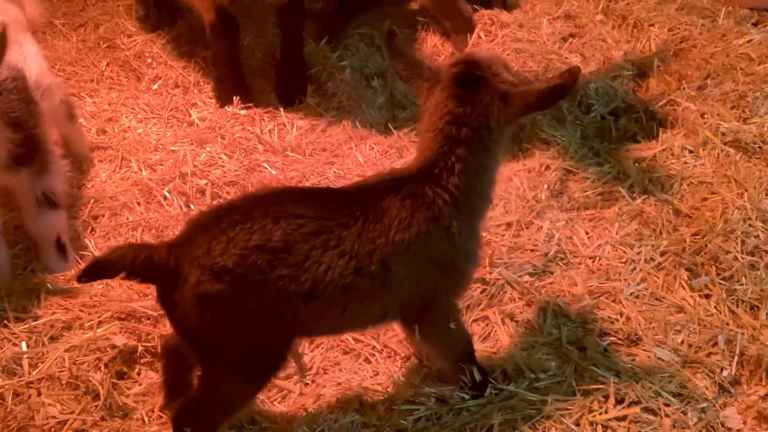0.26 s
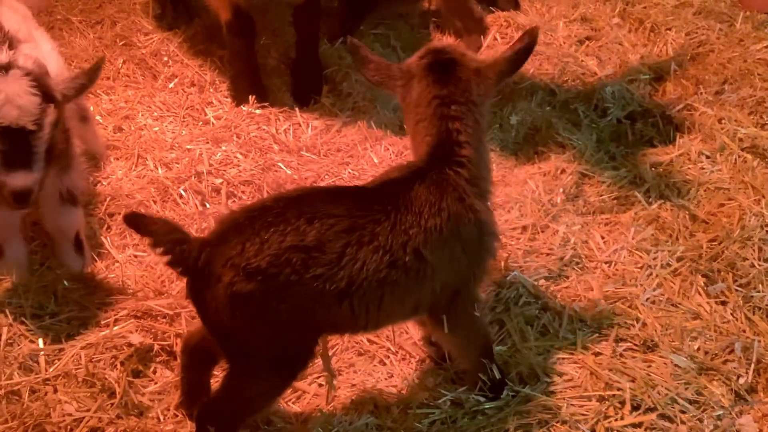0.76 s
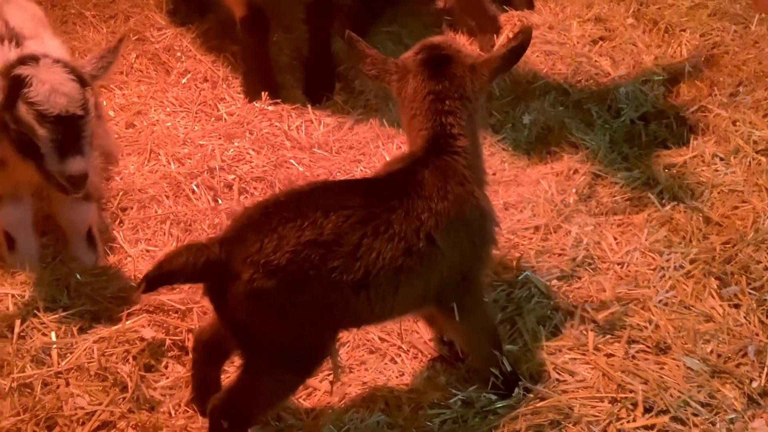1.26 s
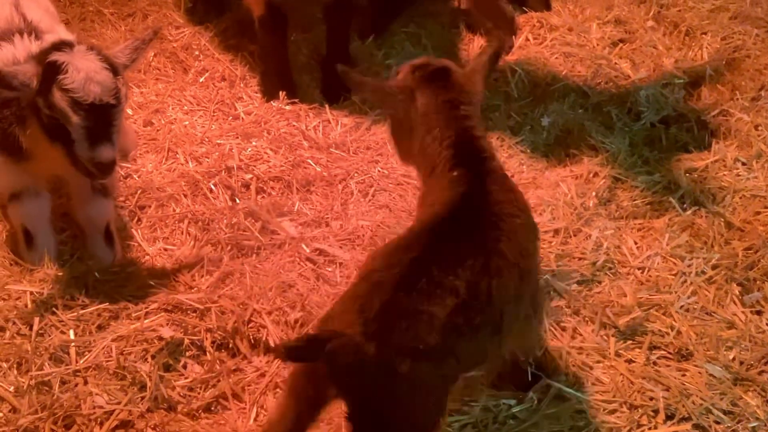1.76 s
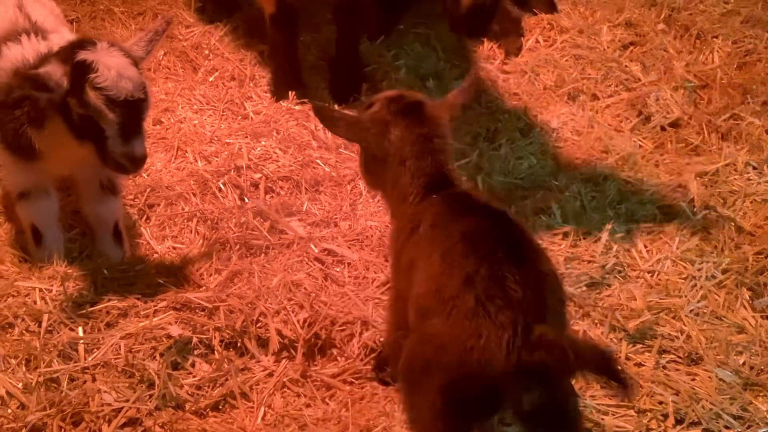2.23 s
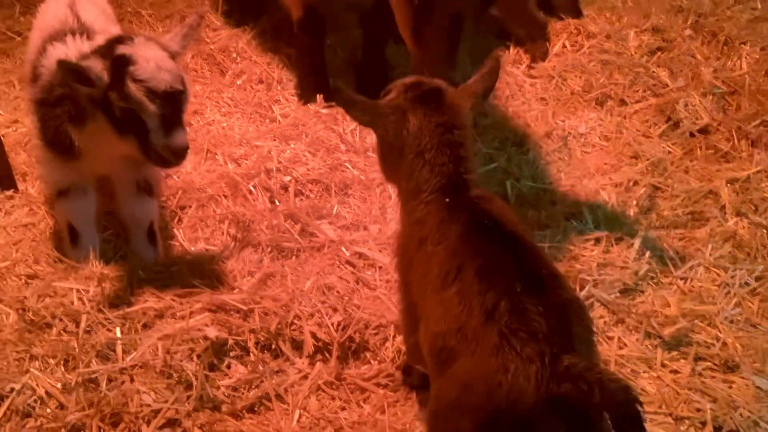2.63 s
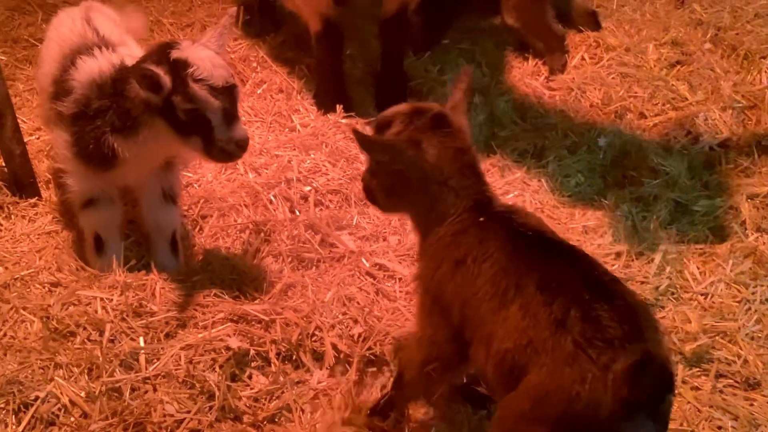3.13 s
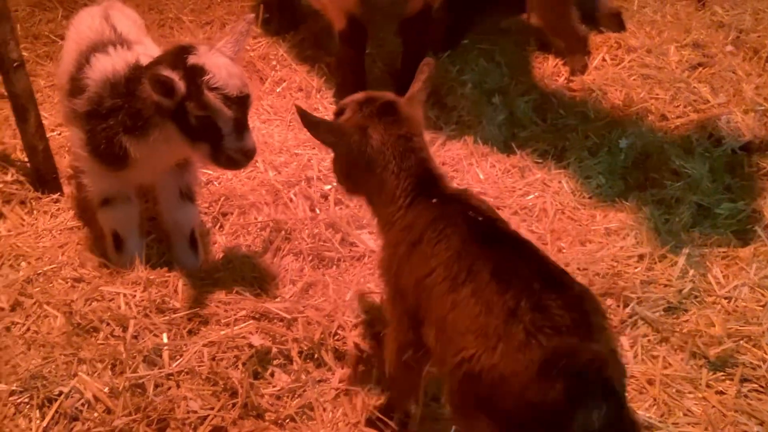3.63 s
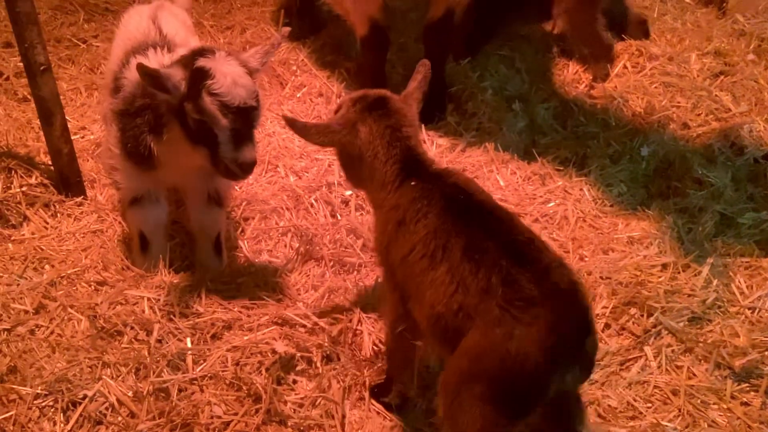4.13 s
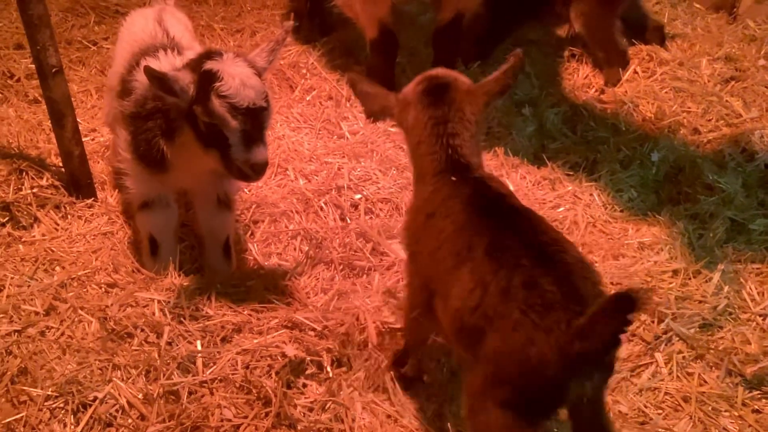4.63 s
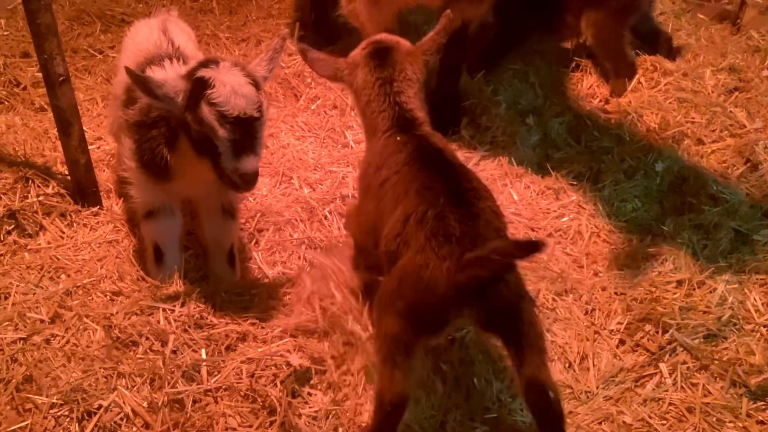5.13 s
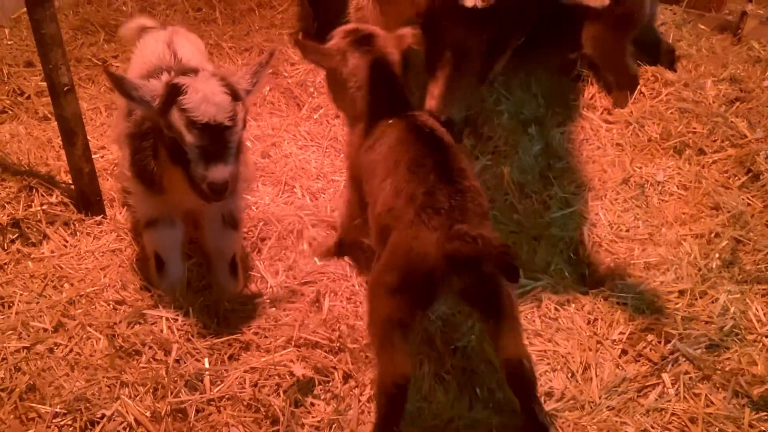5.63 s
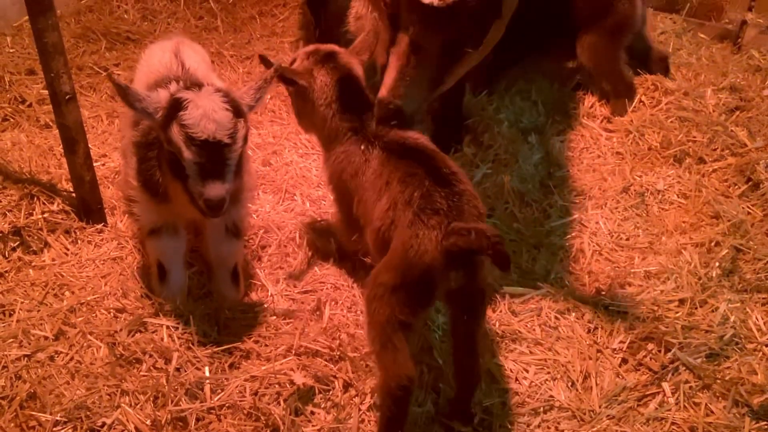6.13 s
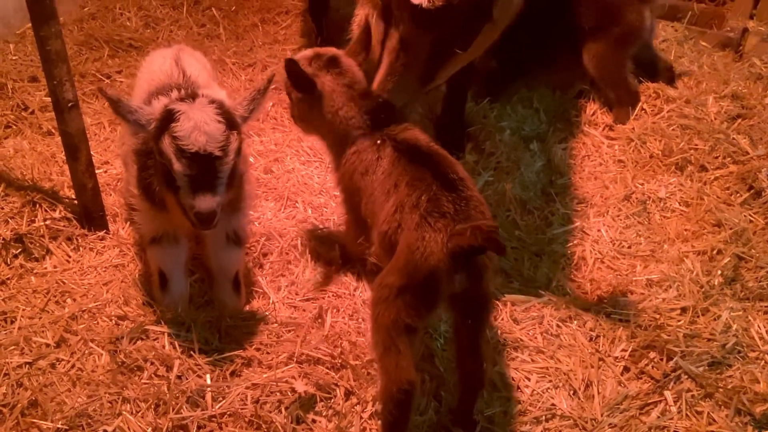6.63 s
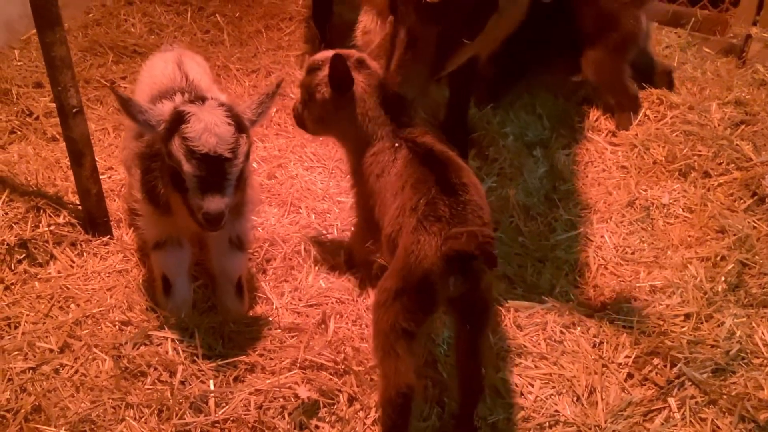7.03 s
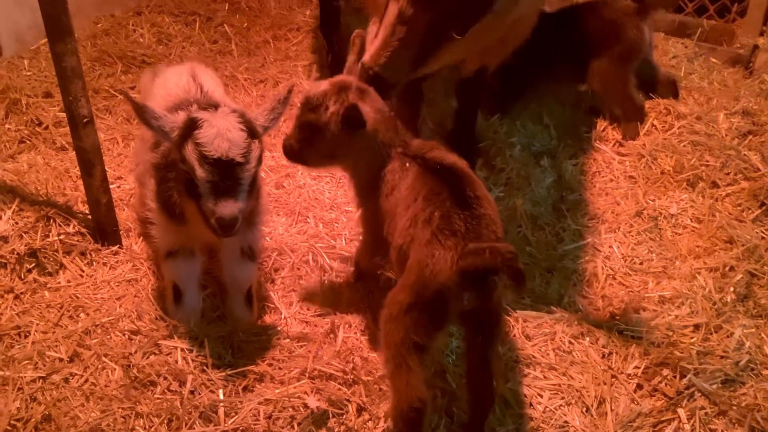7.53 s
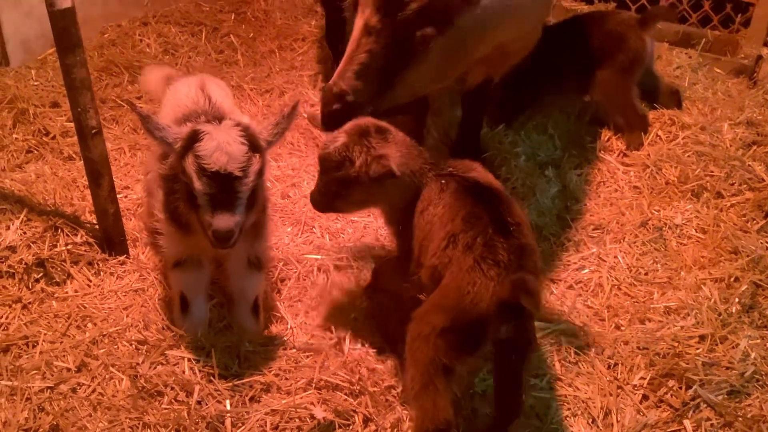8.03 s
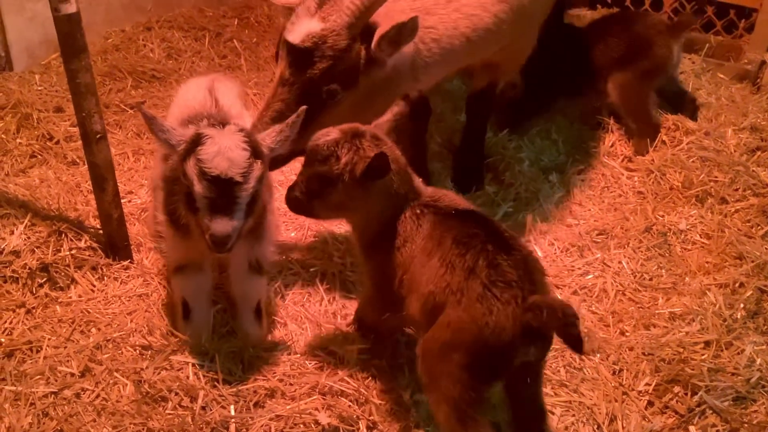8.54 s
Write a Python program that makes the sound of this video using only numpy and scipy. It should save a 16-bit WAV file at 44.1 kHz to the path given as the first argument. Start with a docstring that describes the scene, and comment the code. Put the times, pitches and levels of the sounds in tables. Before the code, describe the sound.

Goat kids on straw, heard near in a small, fairly dry pen over low rumble and faint hiss. After a quiet start with tiny crackles, hooves rustle and knock wood, and a clear fluttering bleat rings out. Softer, rougher calls come mid-way with straw shuffling. Then it calms to sniffing puffs and wet little smacks before one muted, creaky bleat near the end.

```python
"""Goat kids in a straw pen

Goat kids bleat close by in a quiet straw-bedded pen, in about ten short voice bursts a second, clear or creaky.
Vocal-fold pulses and leaking air drive resonances of mouth, nose and chest.
Shaped noise makes straw rustle, hay and quick snuffling; ringing noise puffs make snaps, smacks and knocks.
Rumble, a low hum, air, a faint drone and hiss fill the barn; sparse reflections surround the near sounds."""
import sys
import numpy as np
from scipy import signal
from scipy.io import wavfile
from scipy.ndimage import uniform_filter1d

SR = 44100
rng = np.random.default_rng(int(sys.argv[2]) if len(sys.argv) > 2 else 0)


def store_pcm(level_fs):
    """Save levels as 16-bit WAV."""
    pcm = np.round(np.clip(level_fs, -1, 1) * 32767).astype(np.int16)
    wavfile.write(sys.argv[1], SR, np.atleast_2d(pcm).T)


N = 387198  # samples

# mouth resonances per voice, before throat scaling: [hz, width_hz, level_db]
MOUTH_MODES = [
    [(3000, 550, -8), (4280, 300, .1), (5020, 280, -1.6), (6090, 400, -4), (7500, 1200, -18)],
    [(3000, 600, -8), (4100, 450, .1), (5300, 450, -2.1), (6300, 600, -6), (7600, 1200, -15)],
    [(3150, 600, -6), (4300, 500, -1.1), (5000, 350, -1.1), (6150, 600, .1), (7500, 900, -18),
     (10600, 1800, -24)],
]
# nose resonances per voice: [hz, width_hz, level_db]
NOSE_MODES = [
    [(185, 68, 3), (637, 227, -4.5), (1203, 193, -2), (1505, 366, -1), (1615, 420, -7.5)],
    [(484, 1080, 0.5), (710, 960, 3), (1046, 320, 3.5), (1198, 165, 8.5), (1665, 77, -10.5)],
    [(136, 49, -3.5), (330, 267, -6), (740, 200, -7), (1157, 116, 4), (1330, 64, -2), (1390, 380, -12.5)],
]
# chest resonance per voice: [hz]
CHEST_HZ = [347, 336, 210]
# width of each chest resonator stage per voice: [width_hz]
CHEST_WIDTH_HZ = [50, 70, 80]
# throat size per voice: [factor on mouth hz]
THROAT_FACTOR = [1.007, 0.903, 1.034]
# takeover by the second and third voice: [start_s]
VOICE_START_S = [3, 5]
# bleat onsets: [start_s]
BLEAT_START_S = [2, 4.2, 5.27, 5.72, 8.05]
# mouth level per voice at which roughness is ROUGH_LOUD: [level_db]
LOUD_DB = [-31, -42, -23]
ROUGH_LOUD, ROUGH_PER_DB = .12, .015  # weaker bursts are breathier
SHUT_SHARE, OPEN_S = 0.09, 0.12  # opening mouth raises its resonances
BURST_LEAD, BURST_TAIL = 4000, 6000  # samples around the crest


def burst(crest_s, mouth_db, nose_db, chest_db, pulse_hz, rise_ms, fall_ms):
    """Vocal-fold pulses and leaking air under a quick swell leave by mouth, nose and chest."""
    voice = np.searchsorted(VOICE_START_S, crest_s)
    rough = np.clip(ROUGH_LOUD + ROUGH_PER_DB * (LOUD_DB[voice] - mouth_db), 0, 1)
    bleat_age_s = crest_s - BLEAT_START_S[np.searchsorted(BLEAT_START_S, crest_s) - 1]
    throat = THROAT_FACTOR[voice] * (1 - SHUT_SHARE * np.exp(-bleat_age_s / OPEN_S))

    t = np.arange(-BURST_LEAD, BURST_TAIL) / SR
    swell = amp(-6 * (abs(t) * 1000 / np.where(t < 0, rise_ms, fall_ms)) ** 2.08)

    wander = 0.086 * rough * evened(uniform_filter1d(rng.standard_normal(len(t)), size=150))
    turns = np.cumsum(pulse_hz * (1 + wander)) / SR
    turns -= turns[BURST_LEAD]  # one pulse sits on the crest
    pulses = np.diff(np.floor(turns), prepend=np.floor(turns[0]))
    pulses = signal.lfilter([1], [1, -.5], pulses)  # slightly rounded fold closings
    # air leaks after each pulse
    breath = evened((.5 + np.exp(-(turns % 1) / .5)) * rng.standard_normal(len(t)))

    # folds flutter after closing, differently in every burst, colouring the overtones
    flutter = np.r_[1, .11 * np.exp(-np.arange(130) / 45) * rng.standard_normal(130)]
    closing = signal.lfilter(flutter, [1], pulses)
    drive = swell * ((1 - rough) * evened(closing) + rough * breath)

    # rough murmur leaks through the nose on both sides of the burst
    murmur = drive + amp(-11.0 - 6 * abs(t) / np.where(t < 0, .015, .04)) * breath
    mouth = voice_cavity(drive, MOUTH_MODES[voice], throat)
    nose = voice_cavity(murmur, NOSE_MODES[voice])

    # faint hum lingers around the burst; leaking air hardly moves the chest
    linger = amp(-26.5 - 6 * abs(t) / np.where(t < 0, .01, .035))
    chest = (swell + linger) * pulses
    for _ in range(3):  # narrow and steep: builds late, rings on
        chest = resonate(chest, CHEST_HZ[voice], CHEST_WIDTH_HZ[voice])
    return amp(mouth_db) * crested(mouth) + amp(nose_db) * crested(nose) + amp(chest_db) * crested(chest)


def voice_cavity(drive, modes, scale=1):
    """Parallel resonances of alternating sign, each two stages, the second twice as wide."""
    out = np.zeros(len(drive))
    for k, (hz, width_hz, db) in enumerate(modes):
        ring = resonate(drive, hz * scale, width_hz)
        out += (-1) ** k * amp(db) * resonate(ring, hz * scale, 2 * width_hz)
    return out


def crested(x):
    """Scales the loudest 350-sample window to rms 1."""
    return x / np.sqrt(uniform_filter1d(x ** 2, size=350).max())


# voice bursts: [crest_s, mouth_db, nose_db, chest_db, pulse_hz, rise_ms, fall_ms], -6 dB at rise and fall
BURSTS = [ (2.024, -50, -45.5, -58.5, 336, 8.1, 4), (2.093, -41.5, -46, -42.5, 359.5, 7.6, 8.1),
          (2.174, -30.5, -41.5, -34, 363.2, 12.6, 2.2), (2.252, -32, -43, -32.5, 352.2, 8.9, 4.3),
          (2.3324, -34, -41, -58.5, 149.5, 4.1, 14), (2.351, -31, -42, -32, 357, 9.4, 3.9),
          (2.4333, -35.5, -45.5, -58.5, 159.4, 4.8, 3.1), (2.444, -35, -42.5, -31.5, 345.7, 11.2, 3),
          (2.539, -36.5, -39, -38.5, 338.6, 9.9, 4.5), (2.635, -36.5, -44.5, -36, 335.4, 15, 1.8),
          (2.738, -54, -49.5, -50, 347, 18, 14), (2.835, -47, -44.5, -46.5, 184.8, 8.3, 6.4),
          (4.22, -59.5, -53.5, -63, 353, 9.9, 5.5), (4.298, -45.5, -43.5, -53, 330, 11.6, 6.5),
          (4.378, -53, -52, -67, 167, 2.2, 11), (4.404, -40.5, -41.5, -53, 333.7, 10, 13.6),
          (4.511, -53.5, -51, -86, 320.7, 21, 10), (4.6, -83, -55, -86, 330.4, 140, 48),
          (5.293, -62, -53.5, -66, 193, 5.6, 2.9), (5.335, -47.5, -43, -69, 234, 6.9, 4.8),
          (5.4074, -33.5, -35.5, -42.5, 153.7, 3.5, 12.4), (5.5119, -34.5, -35, -43.5, 119.8, 12.3, 5.5),
          (5.565, -64, -56.5, -53.5, 117.3, 34, 10), (5.611, -66, -58.5, -59, 61, 5.4, 10),
          (5.754, -74, -51, -61, 161, 46, 9.5), (5.814, -42.5, -39, -54, 157, 7.3, 7.3),
          (5.862, -70, -71, -61, 130.8, 8.5, 14), (8.088, -71, -55, -62, 121.9, 12, 20),
          (8.134, -75, -55.5, -64, 137, 13, 14), (8.198, -59.5, -48.5, -49.5, 205, 15, 5.3),
          (8.279, -45, -41, -43, 123, 11.7, 7.5), (8.376, -53.5, -41.5, -46.5, 138.3, 3.4, 13),
          (8.445, -79, -82, -56.5, 115.6, 100, 7.4)]
# bright noise of escaping air and fine straw: [hz, density_db_per_hz]
FIZZ_COLOUR = [(6000, -37), (9000, -2), (11000, -8), (13000, -9), (15500, -5.5)]
AIR_UNDER_MOUTH_DB, AIR_RISE_DB_S, AIR_FALL_DB_S = -24, 900, 580


def bleats():
    """All voice bursts, each with a fine hiss of escaping air."""
    voices = np.zeros(N)
    for row in BURSTS:
        add(voices, row[0] - BURST_LEAD / SR, burst(*row))
    air_rows = [(row[0], 0, row[1] + AIR_UNDER_MOUTH_DB) for row in BURSTS]
    air = swells(air_rows, AIR_RISE_DB_S, AIR_FALL_DB_S)
    return voices + air * noise(FIZZ_COLOUR, patchy_db=-1.0, flicker_db=3.5)


# hooves knocking on wood under the bedding: [start_s, tap_db, tap_hz, tap_width_hz, tap_t60_s,
# thump_db, thump_hz, thump_t60_s, sag_share]; thump starts sag_share above thump_hz
KNOCKS = [(1.927, -28.5, 1690, 382, 0.017, -36, 95, 0.2, 0.94),
          (1.931, -33.5, 3850, 600, 0.03, -34, 198, 0.1, 0.086),
          (1.934, -33, 320, 527, 0.2, -36, 141, 0.11, 0.1),
          (1.941, -34, 3780, 1500, 0.044, -48, 70, 0.16, .1),
          (6.278, -45.5, 1500, 3000, 0.041, -77, 200, 0.032, .1),
          (6.2894, -34, 1100, 2600, 0.0047, -35.5, 64, 0.11, 2.5)]


def hoof_knocks():
    """Ringing noise tap plus a low decaying sine whose pitch sags."""
    out, t = np.zeros(N), np.arange(SR // 2) / SR
    for start_s, *tap, thump_db, thump_hz, t60_s, sag_share in KNOCKS:
        turns = np.cumsum(thump_hz * (1 + sag_share * np.exp(-t / 0.005))) / SR
        envelope = amp(thump_db - 60 * t / t60_s) * (1 - np.exp(-t / 0.0047))
        add(out, start_s, snap(*tap))
        add(out, start_s, envelope * np.sin(2 * np.pi * turns))
    return out


# hooves shuffling in straw: [start_s, hold_s, rustle_db, fizz_db]
STEPS = [(1.43, 0.031, -54, -66), (1.511, .005, -46, -56), (1.636, 0.12, -56, -65), (1.906, 0.14, -49, -61),
         (2.083, 0.088, -45.5, -52), (2.241, 0.026, -45, -55), (2.312, 0.023, -52.5, -73),
         (2.418, 0.24, -55, -73), (2.728, 0.092, -61.5, -76), (2.852, 0.095, -57.5, -72),
         (2.963, 0.057, -54.5, -61), (3.09, 0.15, -63.5, -76), (3.328, 0.15, -68, -89),
         (3.494, 0.13, -60.5, -67.5), (3.584, 0.1, -54.5, -62), (3.749, 0.089, -54.5, -61),
         (3.936, 0.18, -57, -63), (4.209, 0.0097, -56, -61.5), (4.291, 0.019, -54.5, -68),
         (4.382, 0.023, -56, -63.5), (4.467, 0.23, -60, -70), (4.74, 0.06, -66.5, -75),
         (4.93, 0.061, -57, -61.5), (5.061, 0.013, -54, -61.5), (5.124, 0.24, -58.5, -62.5),
         (5.626, 0.054, -56, -66), (5.748, 0.082, -54, -65.5), (5.9, .07, -71, -95),
         (7.96, 0.015, -59, -69), (8.038, 0.1, -60, -66), (8.275, 0.11, -55, -61.5),
         (8.484, 0.11, -61, -80), (8.662, .02, -62.5, -78), (8.725, .04, -72, -81)]
# dense straw noise: [hz, density_db_per_hz]
RUSTLE_COLOUR = [(590, -51), (1000, -1), (1380, -8), (1690, -1.5), (2140, 1.5), (2480, -4.5), (2700, 0),
                 (4430, 2.5), (4950, -1.5), (7220, -0.5), (9000, -13), (11700, -45), (19800, -120)]
STEP_RISE_DB_S, STEP_FALL_DB_S, FIZZ_FALL_DB_S = 262, 190, 195
CRACKLES_PER_S = 500


def straw():
    """Dense rustle and fizz, with random crackles that follow the rustle level."""
    strength = amp(3.3 * np.minimum(rng.exponential(1, N), 4)) * rng.standard_normal(N)
    crackle = strength * (rng.random(N) < CRACKLES_PER_S / SR)
    crackle = evened(resonate(crackle, 4350, 3050))
    rustle = evened(noise(RUSTLE_COLOUR, patchy_db=2.0, flicker_db=1.6) + 0.34 * crackle)
    fizz = noise(FIZZ_COLOUR, patchy_db=2.5, flicker_db=0.9)
    low = swells([(s, hold, db) for s, hold, db, _ in STEPS], STEP_RISE_DB_S, STEP_FALL_DB_S)
    high = swells([(s, hold, db) for s, hold, _, db in STEPS], STEP_RISE_DB_S, FIZZ_FALL_DB_S)
    return low * rustle + high * fizz


# single stalks snapping: [start_s, peak_db, hz, t60_s]
SNAPS = [(.325, -48.5, 1070, 0.06), (.33, -62.5, 6500, 0.078), (.5408, -52.5, 2650, 0.04),
         (.555, -60, 5200, .14), (.73, -66, 6200, .02), (.806, -56, 7400, .054), (.85, -52, 6600, 0.022),
         (.896, -46, 1530, 0.029), (.897, -60, 7000, .05), (.9, -58.5, 3200, 0.045),
         (1.135, -64.5, 7200, .067), (1.6474, -44.5, 2000, 0.012), (3.4548, -46.5, 4440, 0.017),
         (3.492, -46, 4440, 0.017), (3.8294, -54, 5300, .015), (4.7641, -52.5, 6590, 0.016),
         (6.722, -62, 5840, .013), (7.1232, -66, 5500, 0.012), (7.21, -60, 7260, .013),
         (7.485, -61, 6300, 0.033), (7.715, -56, 1030, 0.17)]
SNAP_WIDTH_HZ, SNAP_WIDTH_SHARE = 160, 0.16  # higher stalks ring broader


def stalk_snaps():
    """Each breaking stalk is a brief noise puff ringing one resonance."""
    out = np.zeros(N)
    for start_s, peak_db, hz, t60_s in SNAPS:
        add(out, start_s, snap(peak_db, hz, SNAP_WIDTH_HZ + SNAP_WIDTH_SHARE * hz, t60_s))
    return out


# lips smacking: [start_s, level_db]
SMACKS = [(6.496, -62), (6.7446, -56), (6.916, -49), (7.236, -50.5), (7.4086, -61), (7.456, -57),
          (7.4715, -52)]
# snout resonances: [hz, width_hz, level_db]
SNOUT_MODES = [(2055, 190, -12), (2740, 400, -6.5), (3915, 430, -2.5)]
SMACK_T60_S = 0.019


def lip_smacks():
    """Each smack rings all snout resonances."""
    out = np.zeros(N)
    for start_s, db in SMACKS:
        for hz, width_hz, mode_db in SNOUT_MODES:
            add(out, start_s, snap(db + mode_db, hz, width_hz, SMACK_T60_S))
    return out


# snuffling puffs: [start_s, hold_s, level_db]
PUFFS = [(6.04, .2, -65.5), (6.33, 0.014, -65), (6.49, 0.08, -63.5), (6.7, 0.052, -68.5),
         (6.915, 0.044, -72.5), (7.01, 0.017, -70.5), (7.17, .08, -71.5), (7.406, 0.057, -76.5),
         (7.58, 0.14, -67.5), (7.73, 0.0064, -59), (7.8, 0.071, -72.5)]
# breath noise: [hz, density_db_per_hz]
PUFF_COLOUR = [(900, -13), (1800, -4), (4500, -19.5), (7000, -12.5), (8500, -21), (15500, -42)]
PUFF_RISE_DB_S, PUFF_FALL_DB_S = 320, 290


def snuffling():
    """Quick puffs of breath noise with snout resonances."""
    breath = noise(PUFF_COLOUR, patchy_db=3.0, flicker_db=0, modes=SNOUT_MODES)
    return swells(PUFFS, PUFF_RISE_DB_S, PUFF_FALL_DB_S) * breath


# hay whispers farther off: [start_s, hold_s, level_db]
HAY = [(.06, 0.32, -73.5), (.3, .04, -66.5), (.42, 0.032, -66.5), (.545, 0.035, -64), (.7, 0.3, -80.5),
       (.9, 0.015, -73), (1.09, .02, -76)]
# hay noise: [hz, density_db_per_hz]
HAY_COLOUR = [(1800, -7.5), (2700, -7.5), (3400, -4), (4200, -1), (4800, -12.5), (5500, -22), (6200, -24),
              (12000, -51)]
HAY_RISE_DB_S, HAY_FALL_DB_S = 230, 220


def hay():
    """Faint swells of patchy, flickering noise."""
    return swells(HAY, HAY_RISE_DB_S, HAY_FALL_DB_S) * noise(HAY_COLOUR, patchy_db=2.5, flicker_db=2)


# barn levels, changing as the microphone moves: [time_s, rumble_db, air_db, drone_db]
BARN = [(0, -72, -59.5, -61.5), (.5, -65.5, -60, -64), (1.75, -67, -64, -70), (1.9, -65.5, -61, -71),
        (2.95, -65, -62, -70), (3.2, -72, -67, -76), (3.55, -72.5, -65.5, -76), (4.1, -67, -65.5, -76),
        (4.85, -74.5, -70, -81), (5.3, -71.5, -68, -82), (6.2, -72, -68, -85), (6.5, -76, -68.5, -78),
        (6.87, -79, -73.5, -86), (7.05, -74, -69.5, -84), (7.8, -76, -77.5, -82.5), (8.3, -72, -62.5, -84),
        (8.6, -87, -72.5, -88), (8.78, -89, -72, -84)]
# rumble noise: [hz, density_db_per_hz]
RUMBLE_COLOUR = [(38, -35), (48, -10), (55, 13), (75, 15.5), (95, 5.5), (120, -16), (180, -34.5)]
# air murmur: [hz, density_db_per_hz]
AIR_COLOUR = [(90, -2.5), (140, -3.5), (205, -2.5), (265, -7.5), (465, -2.5), (540, -8), (1100, -7.5),
              (1550, -13), (2500, -29.5), (5500, -86)]
# fuzzy drone bands: [hz, width_hz, level_db]
DRONE_BANDS = [(204.3, 18, -6.5), (479.6, 50, 0), (615, 36, -4), (695, 48, -2.5), (805, 24, -9)]
HUM_HZ, HUM_WIDTH_HZ = 74.5, 4.7


def barn():
    """Rumble with a wavering narrowband hum, a wash of air and a drone of narrow noise bands."""
    time_s, *levels_db = np.transpose(BARN)
    t = np.arange(N) / SR
    rumble_gain, air_gain, drone_gain = (amp(np.interp(t, time_s, db)) for db in levels_db)
    hum = evened(resonate(rng.standard_normal(N), HUM_HZ, HUM_WIDTH_HZ))
    rumble = noise(RUMBLE_COLOUR, patchy_db=2.0, flicker_db=0.5, size=4096) + .5 * hum
    air = noise(AIR_COLOUR, patchy_db=1.5, flicker_db=1.2, size=2048)
    white = rng.standard_normal(N)
    drone = np.zeros(N)
    for hz, width_hz, db in DRONE_BANDS:
        band = resonate(resonate(white, hz, width_hz), hz, width_hz)
        drone += amp(db) * evened(band)
    return rumble_gain * rumble + air_gain * air + drone_gain * evened(drone)


# background hiss: [hz, density_db_per_hz]
HISS_COLOUR = [(710, -22), (1200, -1), (3530, -5.5), (4720, -4.5), (9720, -11), (14500, -17.5),
               (15800, -5.5)]
HISS_DB = -78


def hiss():
    """Faint noise at constant gain, patchy and flickering."""
    return amp(HISS_DB) * noise(HISS_COLOUR, patchy_db=4, flicker_db=1.5)


# pen decay: [hz, t60_s]
PEN_DECAY = [(200, 0.47), (1200, 0.16), (4500, 0.14), (12000, 0.22)]
# reflection colour, lows soaked up by the bedding: [hz, level_db]
PEN_COLOUR = [(400, -11), (800, -1), (5000, 0), (10000, -4)]
PEN_DB = -8


def pen(x):
    """Sparse reflections of random sign, each band dying at its own speed."""
    echoes = np.zeros(SR // 2)
    at = np.arange(300, len(echoes) - 20, 20)
    echoes[at + rng.integers(0, 20, len(at))] = rng.choice([-1., 1.], len(at))
    hz, t, z = signal.stft(echoes, SR, nperseg=256)
    decay_db = read(PEN_COLOUR, hz)[:, None] - 60 * t / read(PEN_DECAY, hz)[:, None]
    tail = signal.istft(z * amp(decay_db), SR, nperseg=256)[1]
    return signal.fftconvolve(x, tail / np.linalg.norm(tail))[:N]


def snap(peak_db, hz, width_hz, t60_s):
    """A dying puff of noise rings one two-stage resonance."""
    t = np.arange(9000) / SR
    envelope = amp(-60 * t / t60_s) * (1 - np.exp(-t / (0.028 * t60_s)))
    puff = envelope * rng.standard_normal(len(t))
    ring = resonate(resonate(puff, hz, width_hz), hz, width_hz)
    return amp(peak_db) * ring / abs(ring).max()


def swells(rows, rise_db_s, fall_db_s):
    """Gain from [start_s, hold_s, level_db] rows: each rises, holds and falls; powers add."""
    t = np.arange(0, N + 32, 32) / SR
    start_s, hold_s, db = np.transpose(rows)[:, :, None]
    rise_loss_db = rise_db_s * np.maximum(start_s - t, 0)
    fall_loss_db = fall_db_s * np.maximum(t - start_s - abs(hold_s), 0)
    power = amp(db - rise_loss_db - fall_loss_db) ** 2
    return np.interp(np.arange(N) / SR, t, np.sqrt(power.sum(0)))


def noise(colour, patchy_db, flicker_db, modes=(), size=1024):
    """Coloured noise of rms 1 with drifting patches and a flicker shared by all bands."""
    hop = size // 8
    frames, hz = N // hop + 9, np.fft.rfftfreq(size, 1 / SR)
    a, b, patches = rng.standard_normal((frames, len(hz), 3)).T
    patches = uniform_filter1d(patches, size=12, axis=0)  # across frequency
    patches = evened(uniform_filter1d(patches, size=16, axis=1))  # across time
    flicker = evened(uniform_filter1d(rng.standard_normal(frames), size=3))
    shape = amp(read(colour, hz))
    for mode_hz, width_hz, db in modes:
        shape = shape + amp(db) / (1 + (2 * (hz - mode_hz) / width_hz) ** 2)
    z = (a + 1j * b) * shape[:, None] * amp(patchy_db * patches + flicker_db * flicker)
    return evened(signal.istft(z, nperseg=size, noverlap=size - hop)[1][:N])


def resonate(x, hz, width_hz):
    """One-pole complex resonance, gain about 1 at its centre."""
    r = np.exp(-np.pi * width_hz / SR)
    return 2 * signal.lfilter([1 - r], [1, -r * np.exp(2j * np.pi * hz / SR)], x).real


def read(points, hz):
    """Interpolates a spectrum on a log-frequency axis."""
    point_hz, value = np.transpose(points)
    return np.interp(np.log(hz + 1), np.log(point_hz + 1), value)


def amp(db):
    """Decibels to gain."""
    return 10 ** (np.asarray(db) / 20)


def evened(x):
    """Scales to rms 1."""
    return x / np.sqrt(np.mean(x ** 2) + 1e-20)


def add(mix, start_s, sound):
    """Mixes a sound in at start_s."""
    part = mix[round(start_s * SR):][:len(sound)]
    part += sound[:len(part)]


def scene():
    """Near sounds with pen reflections, over straw, snuffling, hay and barn."""
    near = bleats() + hoof_knocks() + stalk_snaps() + lip_smacks()
    background = straw() + snuffling() + hay() + barn() + hiss()
    return (near + amp(PEN_DB) * pen(near) + background)[None]


BASS_CUT_HZ, EDGE_HZ = 44, 15800


def record(dry):
    """Microphone bass roll-off, then a linear-phase band limit."""
    thin = signal.sosfilt(signal.butter(8, BASS_CUT_HZ, "high", fs=SR, output="sos"), dry)
    band_limit = signal.firwin(511, EDGE_HZ, window=("kaiser", 9), fs=SR)
    return signal.oaconvolve(thin, band_limit[None], "same")


dry = scene()
out = record(dry)
store_pcm(out)
```